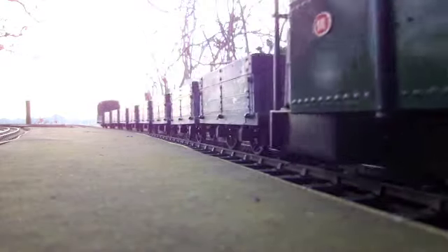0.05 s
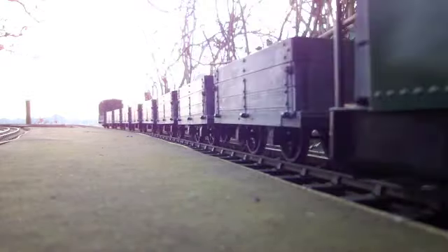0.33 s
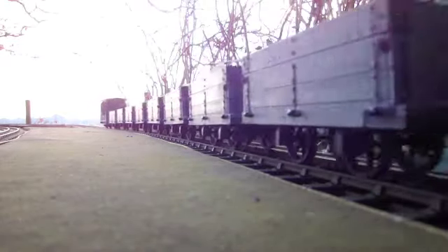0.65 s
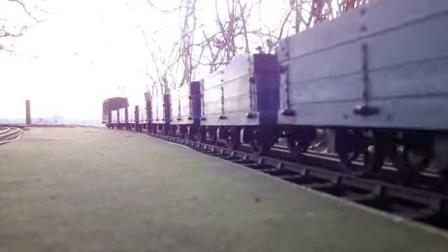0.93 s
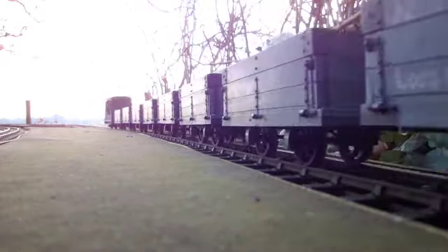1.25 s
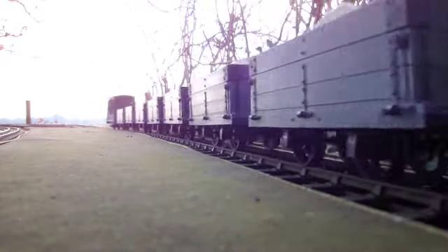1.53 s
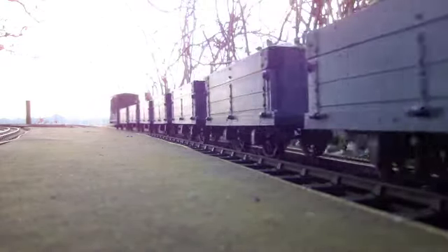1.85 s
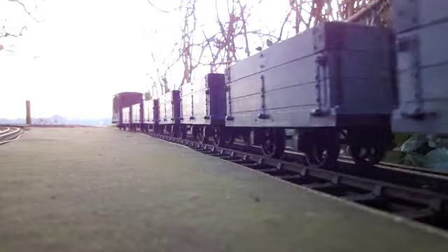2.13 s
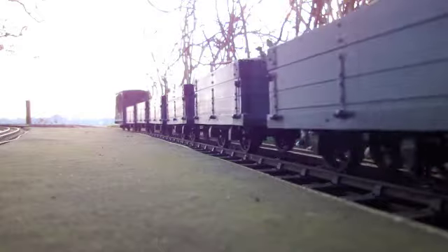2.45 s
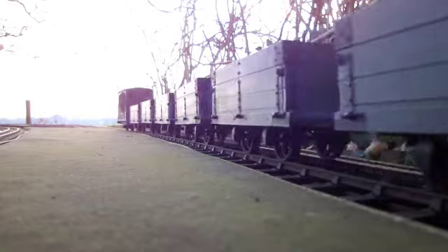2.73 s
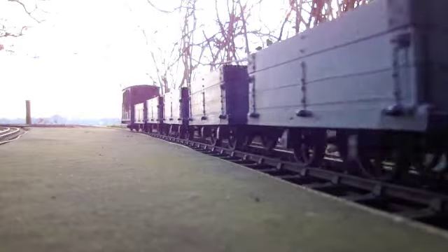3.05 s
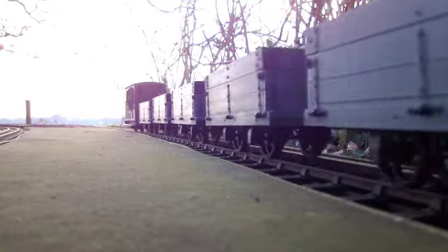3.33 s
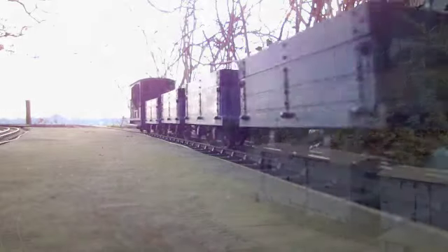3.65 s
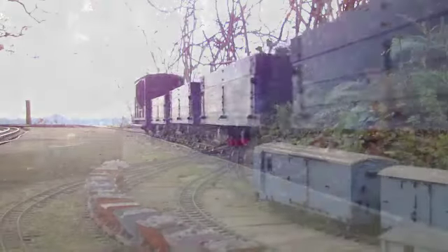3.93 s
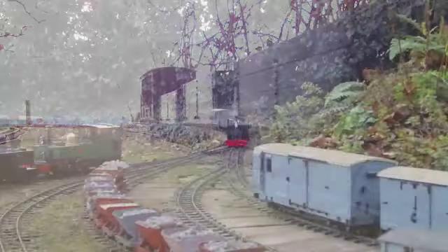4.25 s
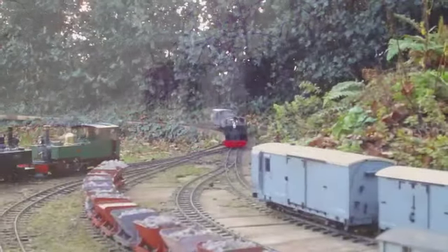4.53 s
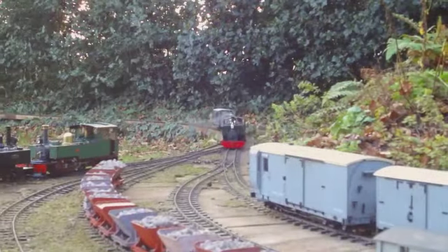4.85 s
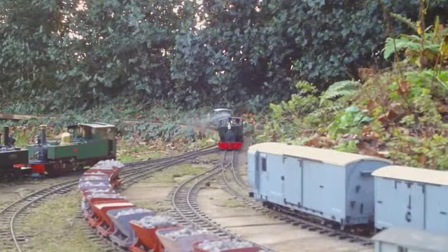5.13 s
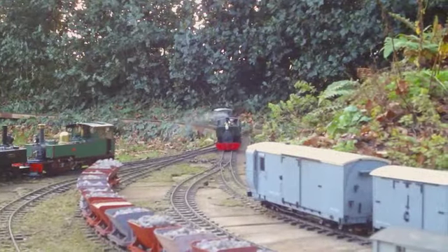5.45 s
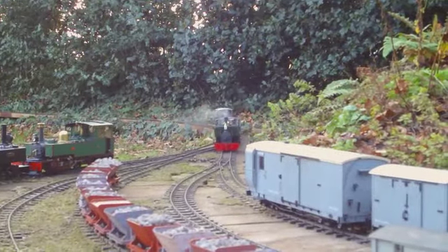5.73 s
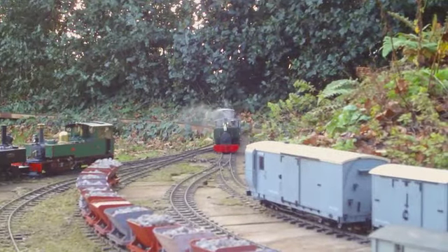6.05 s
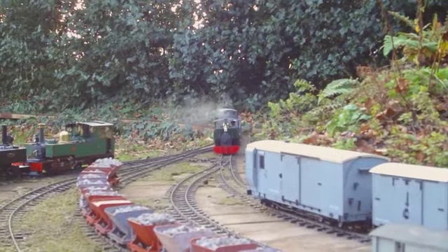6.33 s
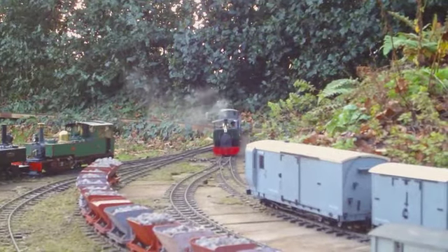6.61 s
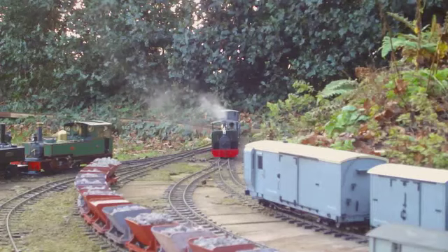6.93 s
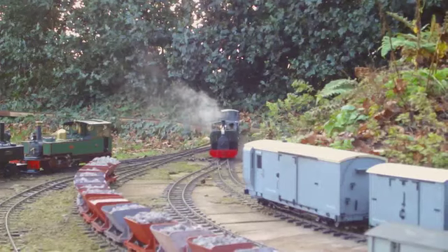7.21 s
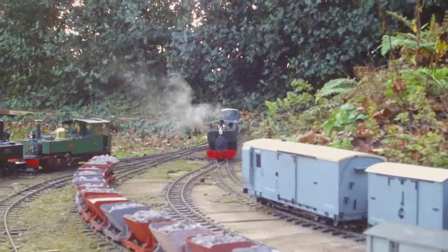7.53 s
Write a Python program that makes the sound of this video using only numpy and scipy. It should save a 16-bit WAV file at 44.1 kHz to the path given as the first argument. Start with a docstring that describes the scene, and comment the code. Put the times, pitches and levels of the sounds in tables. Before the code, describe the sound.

A small live steam locomotive passes close on a garden track with quick, wet, uneven chuffs, hissing steam and a gas burner's roar. Wheels click over rail joints and scrape thinly. The engine recedes while its wagons rumble by and couplings knock. About halfway the sound drops, and faint chuffing approaches from afar, with a few soft microphone bumps and a brief, almost whistling tone near the end.

```python
"""Wet exhaust beats, four a wheel turn, as a small live steam locomotive passes on a garden track.
Steam rings the chimney and hisses at the blast nozzle; the gas burner roars in its flue.
Wagons rumble, flanges scrape, wheels click over rail joints, rods and couplings knock, chains clink.
The train recedes; from 4.5 s one approaches from afar. Near the end a few soft bumps reach the
microphone and a chimney resonance sings briefly."""
import sys
import numpy as np
from scipy import signal
from scipy.fft import rfft, irfft
from scipy.io import wavfile
from scipy.ndimage import uniform_filter1d

SR = 44100
rng = np.random.default_rng(int(sys.argv[2]) if len(sys.argv) > 2 else 0)


def waveform_to_disk(signal):
    """Save audio, clipped to [-1, 1], as 16-bit WAV at the path in sys.argv[1]."""
    frames = np.transpose(np.atleast_2d(signal))
    scaled = np.clip(frames, -1, 1) * 32767
    samples = np.round(scaled).astype(np.int16)
    wavfile.write(sys.argv[1], SR, samples)


N = 343098
TAPS = 2048
TIME_S = np.arange(N) / SR
FREQ_HZ = np.maximum(np.linspace(0, SR / 2, TAPS + 1), 1)

# All table levels are relative.
# viewpoint: t/s, position (0 beside the engine, 1 behind, 2 far in front)
VIEWPOINT = [(0, 0), (.9, .05), (1.9, .9), (4.0, 1.05), (4.65, 2)]
# driving wheel turns: t/s, chimney level/dB, jet level/dB
TURNS_AWAY = [(-.04, -16, -31.5), (.307, -19.5, -36), (.637, -18.5, -38.5), (0.991, -21.5, -38),
              (1.365, -20.5, -36.5), (1.751, -20.5, -34.5), (2.135, -21, -34.5), (2.496, -25, -35.5),
              (2.838, -25.5, -36), (3.159, -27.5, -33.5), (3.473, -28, -37.5), (3.796, -27.3, -40.5),
              (4.112, -33.5, -45.5), (4.418, -41, -51)]
TURNS_TOWARD = [(4.515, -41.5, -48.5), (4.89, -37, -45), (5.265, -38.5, -44.5), (5.605, -37.5, -43.5),
                (5.941, -40.5, -44.5), (6.278, -37, -43), (6.604, -37, -41), (6.919, -38, -42),
                (7.232, -36, -42.5), (7.553, -36, -40.5)]
# four beats, uneven from the valve setting: start/turns, open/turns, chimney level/dB, jet level/dB
BEATS_AWAY = [(0, 0.15, 0, 0), (0.303, 0.13, 0, 1), (0.489, 0.21, 0.26, 0.5), (.71, 0.24, -6.5, -10.5)]
BEATS_TOWARD = [(0, 0.16, 0, 0.5), (.303, 0.18, -0.3, 0), (.508, .214, 1.5, 2.2), (.705, 0.15, -5, -4.5)]
# stronger and weaker beats: t/s, level/dB
BEAT_ACCENTS = [(.41, 2.5), (.64, 0.5), (1.36, -1.5), (2.25, -3), (2.33, 2), (2.67, 1.5), (3.25, -2.5),
                (3.8, 1.5), (3.89, -1), (7.71, 2)]
# chimney resonances by viewpoint: f/Hz, width/Hz, level/dB
CHIMNEY_BESIDE = [(1810, 153, -2.5), (2080, 253, 1.5), (2440, 410, -10.5), (1920, 1800, -25)]
CHIMNEY_BEHIND = [(1791, 187, -3.5), (2037, 133, -5), (2660, 126, -27), (1597, 1210, -24)]
CHIMNEY_FAR = [(1851, 252, 3), (2035, 144, 6), (2195, 75, 5), (2490, 260, -1.5)]
# nozzle hiss bands by viewpoint: f/Hz, width/Hz, level/dB
JET_BESIDE = [(3315, 153, 0.5), (4050, 1060, -11.5), (5640, 710, -8), (7750, 2200, -19), (9280, 500, -11)]
JET_BEHIND = [(3296, 750, 3.5), (4090, 1020, -7.5), (5350, 1100, -9.5), (7100, 3050, -24.5),
              (8870, 1270, -15)]
JET_FAR = [(2785, 334, 6.5), (3510, 410, 3.5), (4190, 490, -5.5), (5520, 1140, -2), (8050, 3200, -7.5),
           (9420, 650, 0.3), (8720, 220, -1)]
# burner, fading with distance: t/s, level/dB
BURNER_LEVEL = [(0, -28), (.45, -28), (.8, -30), (1.5, -39.5), (2.1, -38.5), (3.3, -42.5), (4.5, -52),
                (5.2, -47), (6.5, -45.5), (7.1, -48), (7.78, -46)]
# flue resonances: f/Hz, width/Hz, level/dB
FLUE_NEAR = [(941.5, 90, 3), (873, 410, -12.5)]
FLUE_FAR = [(1014, 122, 4.5), (860, 490, -7)]
# rolling wagons: t/s, level/dB
ROLLING_LEVEL = [(0, -52), (.8, -50.5), (2.0, -45.5), (3.5, -42), (3.9, -44.5), (4.5, -50.5), (4.9, -66),
                 (5.3, -77), (7.78, -62)]
# wagon body spectrum: f/Hz, level/dB
WAGON_SPECTRUM = [(40, -42), (70, -22.5), (120, -9.5), (165, 0.5), (250, -1.5), (330, -3), (600, -4.5),
                  (1000, -7), (1400, -12), (2500, -20.5), (5000, -22.5), (10000, -47)]
# flange rubs on the curve: t/s, length/s, level/dB
FLANGE_RUBS = [(0, 0.2, -35), (1.75, 0.34, -43), (3.736, 0.027, -46.5)]
# wheel and rail resonances: f/Hz, width/Hz, level/dB
WHEEL_MODES = [(5550, 130, 0.5), (5870, 90, 3.5), (6190, 32, 5), (5740, 1160, -4.5), (7360, 710, -9.5),
               (8480, 1150, -11), (9500, 360, -11)]
# outdoor air spectrum: f/Hz, level/dB
AIR_SPECTRUM = [(30, -38), (70, -14.5), (150, -11), (230, -7), (320, -5), (700, -4.5), (1400, -20),
                (2000, -5), (3000, -5), (4600, -20.5), (9500, -17), (11000, -18)]
# impacts: t/s, level/dB
RAIL_JOINTS = [(0.042, -11.5), (0.189, -16), (0.2586, -18.5), (0.473, -25), (0.4904, -17.5), (0.815, -34),
               (0.9464, -28), (0.9996, -22), (1.048, -18), (1.183, -26), (1.3354, -19), (2.1181, -25),
               (2.817, -38), (3.2645, -27), (4.9584, -33), (6.5824, -30), (7.2464, -19.5), (7.6201, -30),
               (7.7134, -26)]
CHIMNEY_POPS = [(0.0687, -10.5), (0.3167, -9), (0.4087, -9), (0.4864, -13), (0.7435, -31), (0.7602, -12),
                (1.564, -26), (1.7578, -32), (1.8642, -14), (1.937, -12.5), (1.9537, -13), (2.008, -13),
                (2.846, -17), (2.9362, -23), (4.1147, -22), (4.2743, -18.5), (5.372, -32), (6.376, -36),
                (6.7087, -29), (7.2514, -30), (7.331, -32)]
COUPLING_KNOCKS = [(1.73, -36), (2.14, -30), (2.475, -31.5), (2.89, -26.5), (3.115, -26), (3.2, -28),
                   (3.465, -40), (3.54, -31.5)]
CHAIN_CLINKS = [(3.5294, -28), (4.2438, -29), (7.2464, -39)]
MIC_BUMPS = [(6.44, -49), (6.493, -36), (6.594, -32), (6.662, -47), (6.726, -46), (6.78, -48), (7.03, -48)]
# microphone bump resonances: f/Hz, width/Hz, level/dB
BUMP_MODES = [(218, 190, -4), (109, 110, -4.5)]
# singing chimney resonance: f/Hz, width/Hz, level/dB
SINGING_MODE = [(2185, 150, 0)]


def undb(db):
    """Decibels to gain."""
    return 10 ** (np.asarray(db) / 20)


def curve(rows):
    """Linear interpolation of (t/s, value) rows."""
    return np.interp(TIME_S, *np.transpose(rows))


def unit_rms(x):
    """Scale to rms 1."""
    return x / np.sqrt(np.mean(x ** 2))


def resonances(rows, order=6):
    """Gain spectrum of steep-sided resonances (f/Hz, width/Hz, level/dB)."""
    steep = 2 ** (1 / order) - 1
    power = sum(undb(db) ** 2 / (1 + steep * ((FREQ_HZ - hz * hz / FREQ_HZ) / width_hz) ** 2) ** order
                for hz, width_hz, db in rows)
    return np.sqrt(power)


def slopes(rows):
    """Gain spectrum through (f/Hz, level/dB) points."""
    hz, db = np.transpose(rows)
    return undb(np.interp(np.log(FREQ_HZ), np.log(hz), db))


def response(spectrum):
    """Minimum-phase impulse response; white noise keeps its power."""
    cepstrum = irfft(np.log(unit_rms(spectrum) + 1e-3))
    cepstrum[1:TAPS] *= 2
    cepstrum[TAPS + 1:] = 0
    return irfft(np.exp(rfft(cepstrum)))[:TAPS]


def ring(x, spectrum):
    """Drive a resonator."""
    return signal.oaconvolve(x, response(spectrum))[:N]


def flutter(rate_hz, spread_db):
    """Smooth random gain about 0 dB."""
    hold = max(int(SR / rate_hz), 1)
    steps = np.repeat(rng.standard_normal(N // hold + 1), hold)[:N]
    return undb(spread_db * unit_rms(uniform_filter1d(steps, hold)))


def grainy(rate_hz, spread_db, share):
    """Noise with a share of its power in tiny impacts."""
    sizes = undb(spread_db * np.clip(rng.standard_normal(N), -2, 2)) * rng.choice([-1, 1], N)
    grains = unit_rms(sizes * (rng.random(N) < rate_hz / SR))
    return np.sqrt(share) * grains + np.sqrt(1 - share) * rng.standard_normal(N)


def strike(rows, spectrum, chatter, chatter_s):
    """Blows (t/s, level/dB) on a resonator, each trailed by chatter."""
    blows = np.zeros(N)
    age_s = TIME_S[:SR // 20]
    for start_s, db in rows:
        force = (age_s == 0) + chatter * np.exp(-age_s / chatter_s) * rng.standard_normal(len(age_s))
        blows[max(int(start_s * SR), 0):][:len(age_s)] += undb(db) * force
    return ring(blows, spectrum) / np.abs(response(spectrum)).max()


def ring_by_view(x, beside, behind, far):
    """Equal-power crossfade of resonances with the viewpoint."""
    view = curve(VIEWPOINT)
    return sum(np.sqrt(np.maximum(1 - abs(view - position), 0)) * ring(x, resonances(modes))
               for position, modes in enumerate((beside, behind, far)))


def train_bounce(x, gain, near_s=.0038, far_s=.000691, shrink_s=1.27):
    """Reflection off the train: a comb whose lag shrinks as it recedes, gone when far."""
    strength = gain * np.clip(2 - curve(VIEWPOINT), 0, 1)
    lag_s = far_s + (near_s - far_s) * np.exp(-TIME_S / shrink_s)
    echo = np.interp(TIME_S - lag_s, TIME_S, x, left=0)
    return (x + strength * echo) / np.sqrt(1 + strength ** 2)


def turn_lengths_s(turns):
    """Each turn lasts until the next; the last keeps its speed."""
    gaps_s = np.diff(np.array(turns)[:, 0])
    return np.append(gaps_s, gaps_s[-1])


def steam_flow(column, open_s, close_s, sag_db, leak_db):
    """Beats swell as the port opens, sag as the cylinder empties, die away over a steady leak."""
    power = np.zeros(N)
    for turns, beats in ((TURNS_AWAY, BEATS_AWAY), (TURNS_TOWARD, BEATS_TOWARD)):
        turns, lengths_s = np.array(turns), turn_lengths_s(turns)
        starts_s = turns[:, 0]
        running = (TIME_S >= starts_s[0]) & (TIME_S < starts_s[-1] + lengths_s[-1])
        effort_db = np.interp(TIME_S, starts_s + lengths_s / np.e, turns[:, column])
        run_power = running * undb(leak_db) ** 2
        for start_s, turn_s in zip(starts_s, lengths_s):
            for beat in beats:
                onset_s, length_s = start_s + beat[0] * turn_s, beat[1] * turn_s
                accent_db = sum(db for at_s, db in BEAT_ACCENTS if abs(at_s - onset_s) < .03)
                span = slice(max(int((onset_s - open_s / 2) * SR), 0), int(onset_s * SR) + SR // 3)
                age_s = TIME_S[span] - onset_s
                opening = np.sin(np.pi / 2 * np.clip(age_s / open_s + .5, 0, 1)) ** 2
                closing = np.exp(-np.maximum(age_s - length_s, 0) / close_s)
                level_db = beat[1 + column] + accent_db - sag_db * (age_s / length_s - .5)
                run_power[span] += (opening * closing * undb(level_db)) ** 2
        power += run_power * undb(effort_db) ** 2
    return np.sqrt(power)


def chimney(gain_db=-1.16):
    """Wet steam sputters in the chimney; distance blurs the droplets into a rush."""
    droplet_share = np.interp(curve(VIEWPOINT), [0, 1, 2], [.38, .4, .1])
    flow = steam_flow(column=1, open_s=.022, close_s=.015, sag_db=3.5, leak_db=-8.5)
    blast = flow * grainy(rate_hz=600, spread_db=2, share=droplet_share)
    return undb(gain_db) * ring_by_view(blast, CHIMNEY_BESIDE, CHIMNEY_BEHIND, CHIMNEY_FAR)


def nozzle_hiss(gain_db=-1.37):
    """The steam jet hisses at the blast nozzle on each beat."""
    flow = steam_flow(column=2, open_s=.024, close_s=.016, sag_db=4.5, leak_db=-10)
    jet = flow * grainy(rate_hz=900, spread_db=8, share=.26)
    hiss = ring_by_view(jet, JET_BESIDE, JET_BEHIND, JET_FAR)
    return undb(gain_db) * train_bounce(hiss, gain=.48)


def burner():
    """A fluttering gas flame roars in the flue."""
    flame = rng.standard_normal(N) * flutter(rate_hz=14, spread_db=.95)
    return ring_by_view(flame, FLUE_NEAR, FLUE_NEAR, FLUE_FAR) * undb(curve(BURNER_LEVEL) - 2.5)


def wagon_rumble():
    """Grit under the wheels shakes the wooden bodies."""
    grit = grainy(rate_hz=350, spread_db=1.5, share=.31) * flutter(rate_hz=12, spread_db=1)
    return ring(grit, slopes(WAGON_SPECTRUM)) * undb(curve(ROLLING_LEVEL) + 4)


def flange_scrape(attack_s=.095, release_s=.029, contact_db=-62.5):
    """Flanges ring the wheels; rubs build, hold and let go over light contact."""
    pressure = undb(contact_db)
    for start_s, length_s, db in FLANGE_RUBS:
        age_s = TIME_S - start_s
        build = np.clip(1 + age_s / attack_s, 0, 1)
        release = np.exp(-np.maximum(age_s - length_s, 0) / release_s)
        pressure = pressure + undb(db) * build * release
    friction = grainy(rate_hz=330, spread_db=7, share=.64) * flutter(rate_hz=40, spread_db=2.2)
    return train_bounce(ring(friction, resonances(WHEEL_MODES)), gain=.5) * pressure


def garden_air(level_db=-51.5):
    """Faint, wavering outdoor air."""
    air = ring(rng.standard_normal(N), slopes(AIR_SPECTRUM))
    return air * undb(level_db) * flutter(rate_hz=5.3, spread_db=.5)


def knocks(gain_db=-2.5, rod_phase_turns=.18, rod_db=-17):
    """Rods knock once a turn as the engine draws away; couplings knock with the same dull ring."""
    rods = [(start_s + rod_phase_turns * turn_s, chimney_db + rod_db)
            for (start_s, chimney_db, _), turn_s in zip(TURNS_AWAY, turn_lengths_s(TURNS_AWAY))]
    body = resonances([(234, 19, 6), (209, 310, -10)])
    return undb(gain_db) * strike(COUPLING_KNOCKS + rods, body, chatter=.005, chatter_s=.004)


def joint_clicks():
    """A rail joint gives a broad crack and rings the wheel."""
    wheel = resonances(WHEEL_MODES + [(5400, 3800, -5.5)])
    return strike(RAIL_JOINTS, wheel, chatter=.12, chatter_s=.003)


def chimney_pops(gain_db=-2):
    """Sharp pops ring the chimney, mostly accenting the start of a beat."""
    pipe = resonances([(1810, 180, 7), (2440, 2000, -20)])
    return undb(gain_db) * strike(CHIMNEY_POPS, pipe, chatter=.043, chatter_s=.0072)


def chain_clinks(gain_db=1.5):
    """Coupling chains clink at one resonance."""
    link = resonances([(2620, 290, 0)])
    return undb(gain_db) * strike(CHAIN_CLINKS, link, chatter=.02, chatter_s=.002)


def mic_bumps():
    """Soft, dull blows on the microphone."""
    return strike(MIC_BUMPS, resonances(BUMP_MODES), chatter=.074, chatter_s=.006)


def chimney_singing(centre_s=7.27, half_width_s=.27, level_db=-42):
    """One chimney resonance swells and fades, almost whistling through the gaps between beats."""
    swell = np.exp(-((TIME_S - centre_s) / half_width_s) ** 4)
    return ring(rng.standard_normal(N), resonances(SINGING_MODE)) * swell * undb(level_db)


def scene():
    """All sources, mono."""
    running = chimney() + nozzle_hiss() + burner() + wagon_rumble() + flange_scrape() + garden_air()
    impacts = knocks() + joint_clicks() + chimney_pops() + chain_clinks() + mic_bumps()
    return (running + impacts + chimney_singing())[None]


def record(dry, rolloff_hz=10100, cutoff_hz=11000):
    """Treble roll-off, then a steep cut."""
    soft = signal.sosfilt(signal.butter(8, rolloff_hz, fs=SR, output="sos"), dry)
    return signal.sosfilt(signal.ellip(10, .2, 80, cutoff_hz, fs=SR, output="sos"), soft)


dry = scene()
out = record(dry)
waveform_to_disk(out)
```